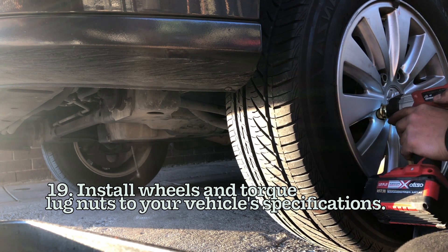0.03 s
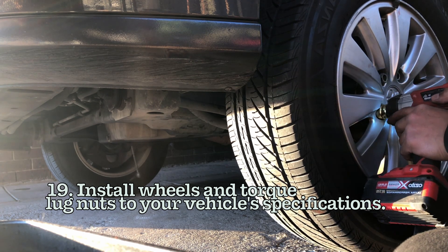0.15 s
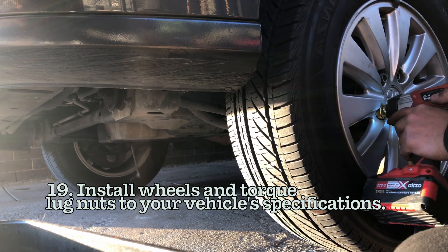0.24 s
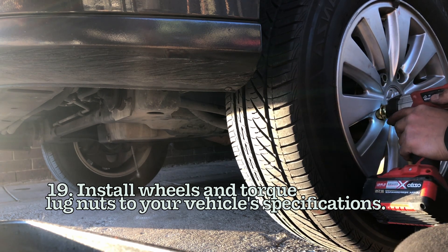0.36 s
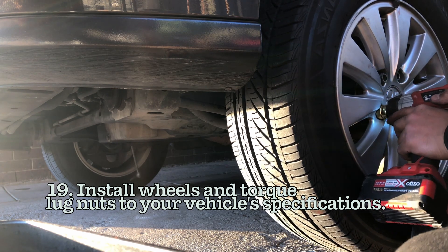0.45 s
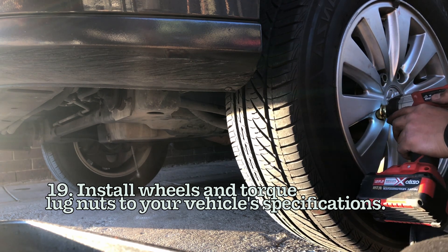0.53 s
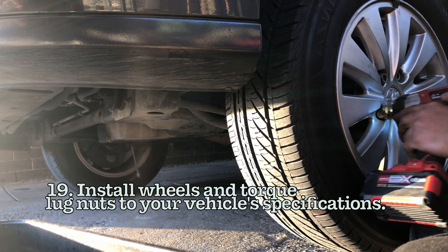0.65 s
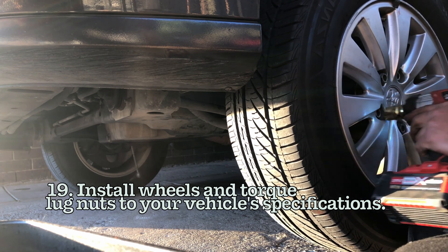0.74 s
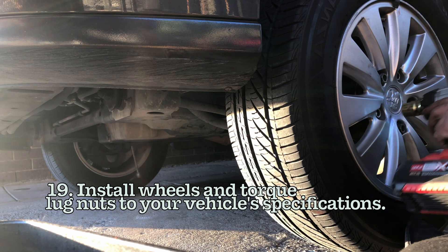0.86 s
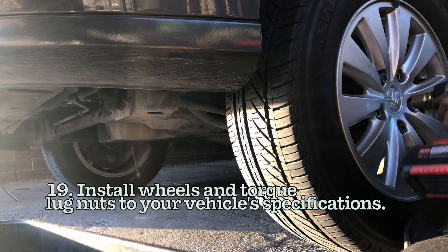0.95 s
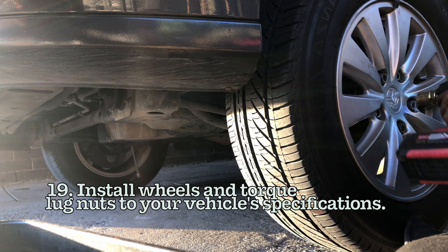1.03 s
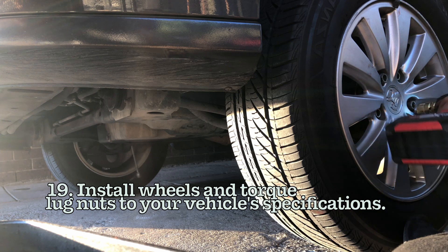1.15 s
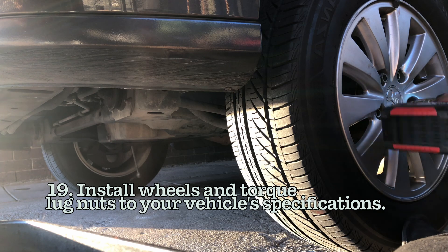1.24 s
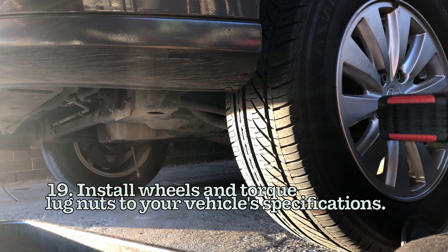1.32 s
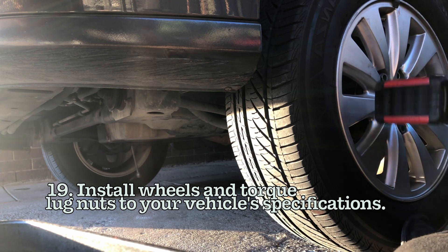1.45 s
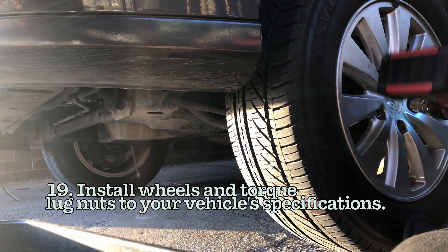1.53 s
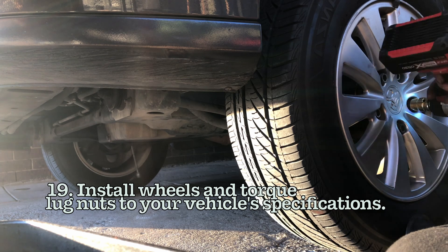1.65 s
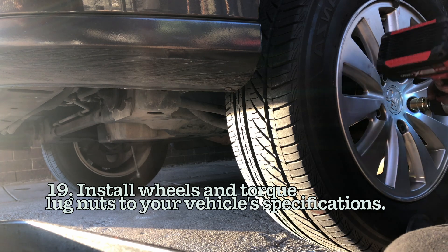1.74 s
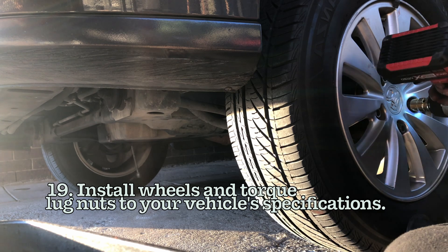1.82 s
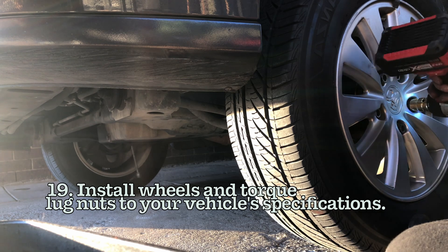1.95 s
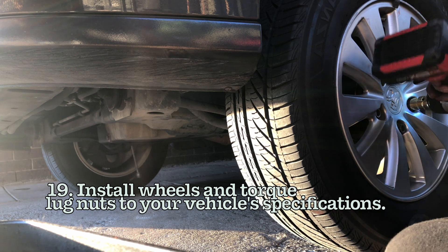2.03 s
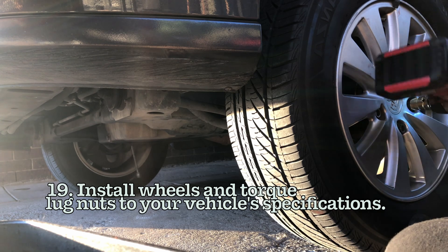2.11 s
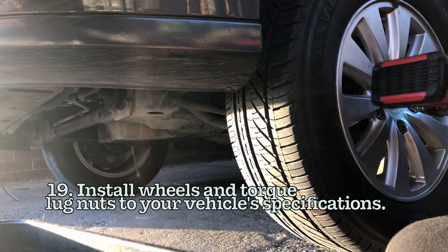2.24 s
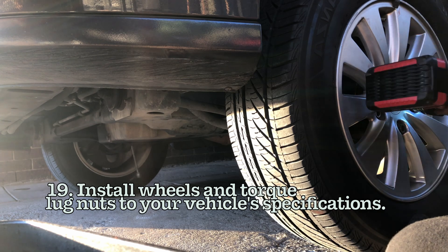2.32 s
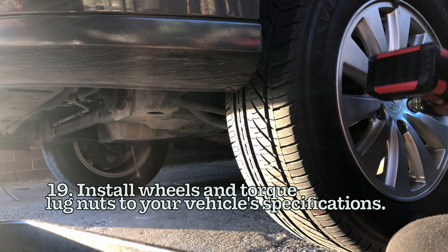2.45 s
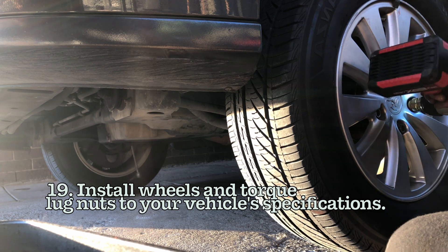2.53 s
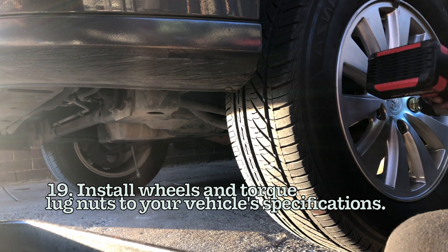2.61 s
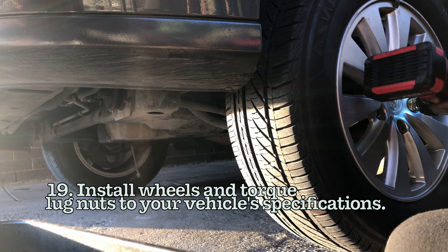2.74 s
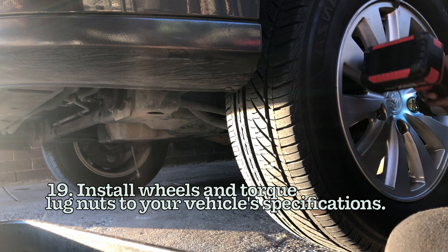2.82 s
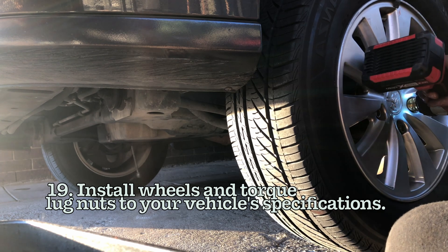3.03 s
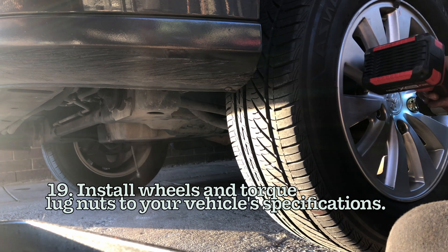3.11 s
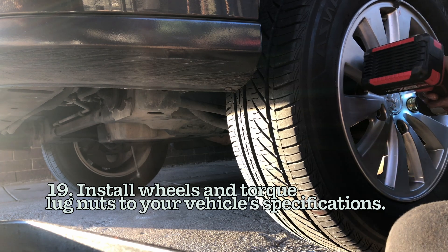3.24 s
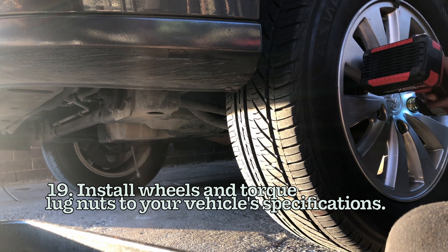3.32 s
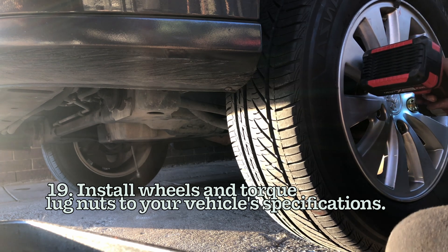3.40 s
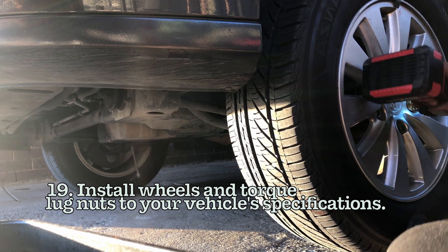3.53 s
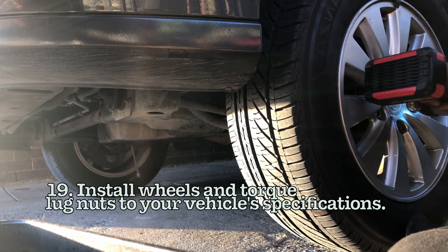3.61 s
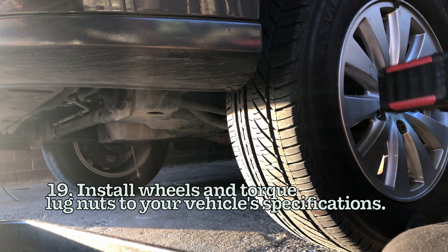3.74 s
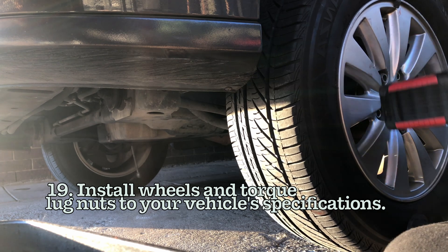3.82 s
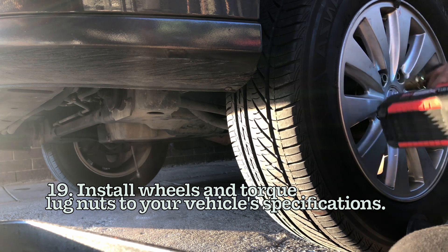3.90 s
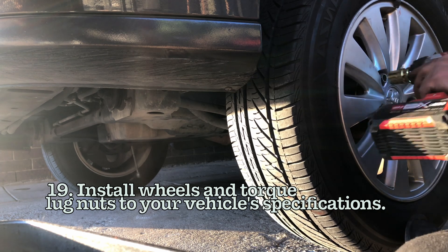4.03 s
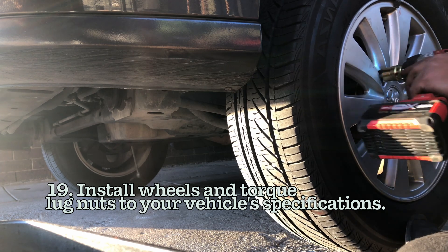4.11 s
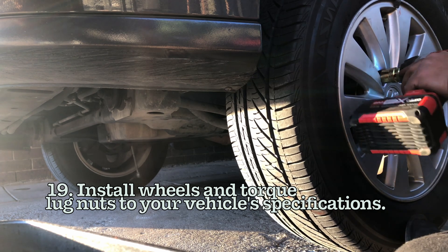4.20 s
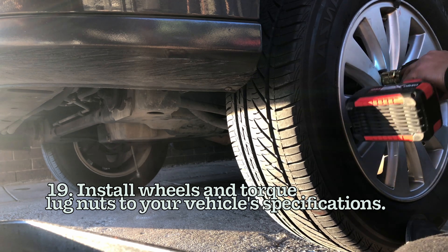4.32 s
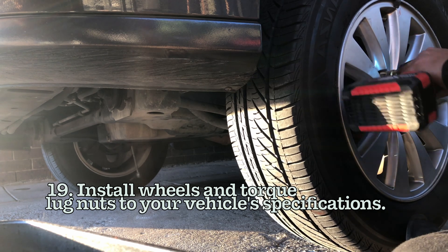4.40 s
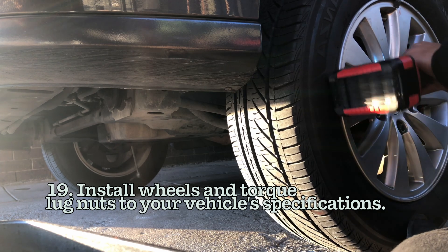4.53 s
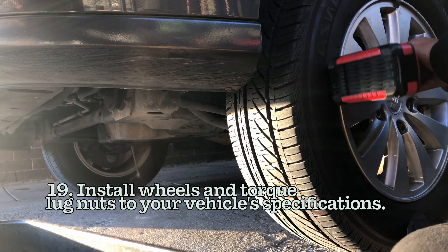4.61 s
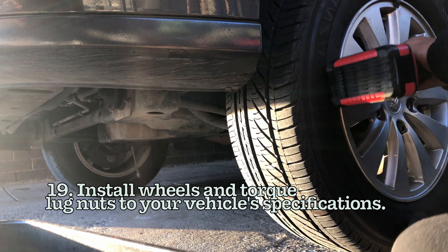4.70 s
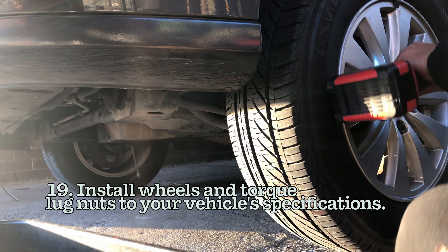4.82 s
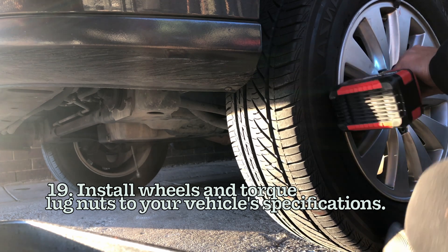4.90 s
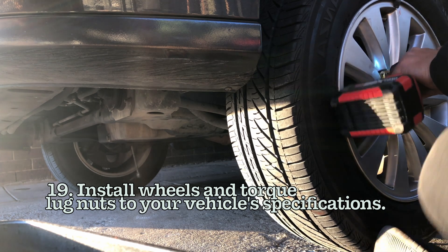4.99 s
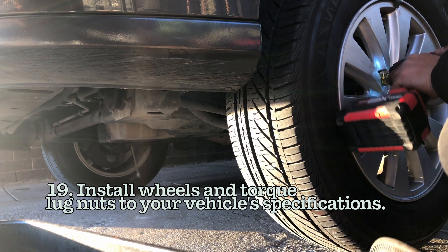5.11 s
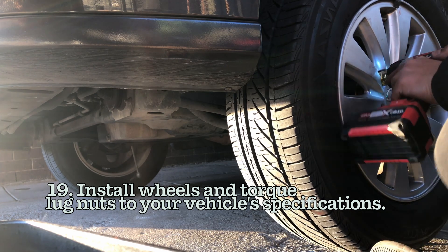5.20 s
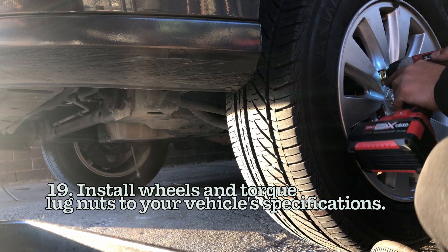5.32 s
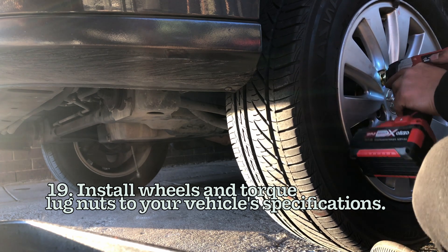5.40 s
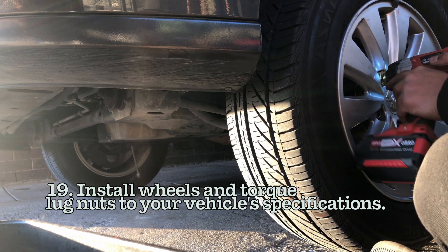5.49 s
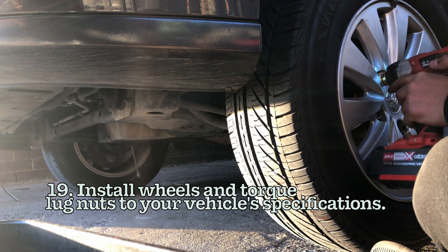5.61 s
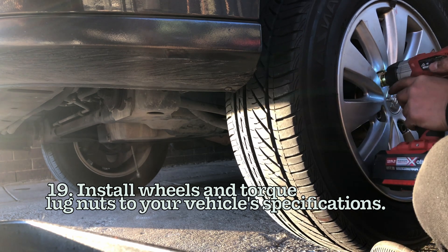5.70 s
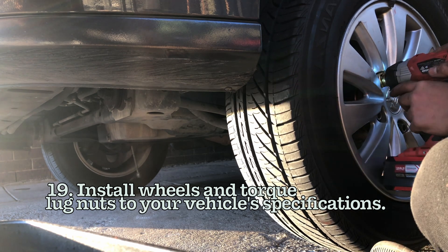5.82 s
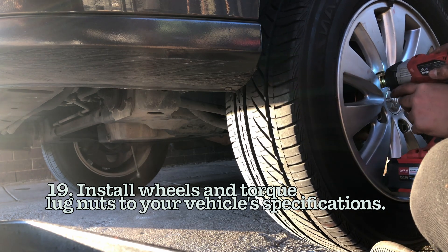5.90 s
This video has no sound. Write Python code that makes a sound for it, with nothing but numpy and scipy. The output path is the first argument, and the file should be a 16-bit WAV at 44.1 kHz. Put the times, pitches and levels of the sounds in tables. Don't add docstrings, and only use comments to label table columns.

```python
import sys
import numpy as np
from scipy import signal
from scipy.fft import rfft, irfft, next_fast_len
from scipy.io import wavfile
from scipy.ndimage import uniform_filter1d

SR = 44100
rng = np.random.default_rng(int(sys.argv[2]) if len(sys.argv) > 2 else 0)


def boost_factor(decibels):
    exponent = np.asarray(decibels, float) / 20
    return 10 ** exponent


def transcribe(signal):
    frames = np.atleast_2d(signal).T
    limited = np.clip(frames, -1, 1)
    pcm = np.round(limited * 32767).astype(np.int16)
    wavfile.write(sys.argv[1], SR, pcm)


N = 262395
T = np.arange(N) / SR

# first_blow_s, last_blow_number, rate_hz, lag_s (lost while gathering speed), gather_blows
BURSTS = [
    (0.0829, 28, 59.2, .0112, 2.5),
    (2.7956, 42, 59.35, .005, 9),
    (5.2968, 39, 60.6, .0075, 13),
]
# time_s, level_db
BUSY = [(0, 9.5), (.66, 1), (.85, -20.5), (1.3, -8), (1.7, -8), (2.15, -2.5), (2.45, 0.5), (2.8, 11.5),
        (3.58, -12), (3.85, -25), (4.15, -13), (4.4, -4), (4.6, -6.5), (4.95, 0), (5.3, -1)]


def evened(x):
    return x / np.sqrt(np.mean(x ** 2) + 1e-20)


def read(points, hz):
    f, value = np.transpose(points)
    return np.interp(np.log(hz + 1), np.log(f + 1), value)


def coloured(x, spectrum):
    size = next_fast_len(len(x) + 512)
    gain = boost_factor(read(spectrum, np.fft.rfftfreq(size, 1 / SR)))
    return irfft(rfft(x, size) * evened(gain), size)[:len(x)]


def add(mix, s, sound):
    part = mix[round(s * SR):][:len(sound)]
    part += sound[:len(part)]


def wander(n, size):
    once = uniform_filter1d(rng.standard_normal(n), size)
    return evened(uniform_filter1d(once, size))


def ring(hz, t60, t):
    return boost_factor(-60 * t / t60) * np.sin(2 * np.pi * hz * t)


def beat(burst):
    start, last, rate, lag, gather = burst
    count = np.arange(last + 1)
    return start + count / rate + lag * (1 - np.exp(-count / gather))


def hammer():
    # time_s, peak_db
    stumbles = [(0.5817, -9), (3.523, -10.5), (4.876, -1), (4.9152, -4), (4.9508, -11), (4.9623, 1.5),
                (4.9804, -5), (5.028, -1.5), (5.0416, -8.5), (5.063, -12), (5.0729, 0.5), (5.098, 3.5),
                (5.117, 0), (5.137, -5.5), (5.1577, 0.5), (5.185, -4.5), (5.2034, -11)]
    settled_db = [-14.5, -15.5, -12]
    loose_db = [3.5, 2, 0]
    seating_blows = 8
    s, peak_db = np.transpose(stumbles)
    out = blows(s, peak_db - 8.0, 2) + thud(s)
    for nut, burst in enumerate(BURSTS):
        at = beat(burst)
        chance = rng.standard_normal((len(at), 2)) * [.0003, 1.2]
        loose = np.exp(-np.arange(len(at)) / seating_blows)
        strength_db = settled_db[nut] + loose_db[nut] * loose + chance[:, 1]
        strength_db[0] += 1
        out += blows(at + chance[:, 0], strength_db, nut) + thud(at)
    return out


def blows(seconds, strength_db, nut):
    # freq_hz, density_db_per_hz
    steel = [
        [(380, -33), (650, -3.5), (1030, -11.5), (1210, -8), (1750, -3.5), (2110, -8.5), (2380, 0.5),
         (3620, -4), (4260, -0.5), (14800, -0.5), (15800, -3.5), (16500, -58.5)],
        [(380, -27), (650, -6), (1350, -12.5), (1870, -7), (2770, -9), (3250, -4), (3770, -10), (4750, -6),
         (11100, -5), (14400, -1), (15600, -2), (16500, -43)],
        [(380, -35.5), (650, -9), (1070, -8.5), (1390, -14), (2380, -3.5), (3480, -7), (4320, -3.5), (5510, -7),
         (7730, -4.5), (15000, -2.5), (15800, -4), (16500, -41.5)],
    ]
    # freq_hz, t60_s, first_nut_db, second_nut_db, third_nut_db
    wheel = [(226.3, 2, -54, -59, -58.5), (368.6, 0.9, -54, -45, -53), (298.2, 0.91, -49.5, -43.5, -51.5),
             (355.7, 0.12, -41, -40.5, -36), (534, 0.37, -37.5, -33.5, -35), (1850, 0.025, -14.5, -19, -17),
             (2300, .014, -13.5, -18.5, -19), (2480, 0.019, -18, -15.5, -10.5),
             (2620, 0.012, -23.5, -25, -12), (2750, 1.0, -52, -63, -76.5)]
    train, lead = np.zeros(N + 400), 300
    train[np.round(seconds * SR).astype(int)] = boost_factor(strength_db)
    t = (np.arange(900) - lead) / SR
    rush = boost_factor(-10.0) * np.exp(-((t + 0.0027) / 0.0026) ** 2)
    after = np.maximum(t + 0.00096, 0)
    crack = 1 - np.exp(-(after / 0.00059) ** 2)
    crack *= np.exp(-after / 0.0013) + boost_factor(-11) * np.exp(-after / 0.0035)
    level = signal.oaconvolve(train, rush + crack)[lead:][:N]
    contact = boost_factor(15.5) * np.roll(train * rng.uniform(-0.87, 1, N + 400), -18)[:N]
    bite = signal.lfilter(*signal.butter(2, 2500, "high", fs=SR), contact)
    out = coloured(level * rng.standard_normal(N) + bite, steel[nut])
    for hz, t60, *db in wheel:
        seated = train[:N] * rng.uniform(-.4, 1.6, N)
        mode = ring(hz, t60, T[:round(t60 * SR)])
        out += boost_factor(db[nut]) * signal.oaconvolve(seated, mode)[:N]
    return out


def thud(seconds):
    train, lead = np.zeros(N), 400
    train[np.round(seconds * SR).astype(int)] = boost_factor(lean_db(seconds) - 14.0)
    t = (np.arange(700) - lead) / SR
    push = np.exp(-((t + .0035) / .0025) ** 2) * np.sin(2 * np.pi * 330 * t)
    push += boost_factor(-4.5) * np.exp(-((t - .0006) / 0.0028) ** 2) * np.sin(2 * np.pi * 1060 * t)
    return signal.oaconvolve(train, push)[lead:][:N]


def lean_db(seconds):
    # start_s, end_s, first_push_db, last_push_db
    leans = [
        (0.083, .59, -26, -20.5),
        (2.79, 3.53, -28, -31),
        (4.877, 5.21, -31.5, -41),
        (5.34, 5.76, -16.5, -18.5),
    ]
    out = np.full(len(seconds), -49.0)
    for start, end, first_db, last_db in leans:
        leaning = (seconds >= start) & (seconds <= end)
        out = np.where(leaning, np.interp(seconds, [start, end], [first_db, last_db]), out)
    return out


def motor():
    # time_s, mesh_hz, whir_db
    pulls = [
        [(0, 2528, -21.5), (.05, 2552, -24.5), (.066, 2480, -18.5), (.084, 2300, -22), (.095, 2250, -38)],
        [(2.452, 347.9, -41), (2.53, 819, -27.5), (2.6, 1340, -28), (2.69, 2225, -24), (2.73, 2541, -24.5),
         (2.765, 2634, -25), (2.785, 2486, -18), (2.8, 2300, -33.5)],
        [(4.73, 501.7, -44), (4.868, 2245, -30.5), (4.884, 1681, -22.5), (4.98, 1876, -27.5),
         (5.06, 2189, -25.5), (5.13, 2405, -32), (5.18, 2464, -26), (5.24, 2428, -31.5), (5.295, 2386, -32)],
    ]
    treble_db = [2.5, 4, 2.5]
    whine_db = [-3.5, -1, -3]
    out = np.zeros(N)
    for row in zip(pulls, treble_db, whine_db):
        add(out, *gear_train(*row))
    return out


def gear_train(pull, treble_db, whine_db):
    s, mesh_hz, whir_db = np.transpose(pull)
    t = np.arange(s[0], s[-1], 1 / SR)
    mesh = np.interp(t, s, mesh_hz)
    octaves = np.log2(mesh / 2550)
    noise = housing_rattle(len(t), octaves, treble_db)
    whine = mesh_whine(mesh)
    shaft = shaft_kicks(mesh)
    sound = boost_factor(-5.0) * noise
    sound += boost_factor(whine_db + 6.5 * octaves) * whine
    sound += boost_factor(-18.5 - 3.5 * octaves) * shaft
    sound *= boost_factor(np.interp(t, s, whir_db))
    fade_out = np.clip((t[-1] - t) / .006, 0, 1)
    fade_in = np.clip((t - t[0] + 0.00045) / 0.0026, 0, 1)
    return s[0], sound * fade_out * fade_in


def housing_rattle(n, octaves, treble_db):
    # freq_hz, density_db_per_hz
    housing = [(180, -55.5), (300, -20), (386, -14.5), (587, -24.5), (987, -17.5), (2060, -12),
               (2930, -8.5), (3590, -13), (4930, -4), (10900, -5.5), (13300, -10), (15700, -7),
               (16500, -55)]
    grain_db = 2.2 * wander(n, 70) + .8 * wander(n, 400)
    rattle = coloured(evened(boost_factor(grain_db) * rng.standard_normal(n)), housing)
    body = signal.sosfiltfilt(signal.butter(3, 4000, fs=SR, output="sos"), rattle)
    treble = rattle - body
    wall = signal.lfilter(*signal.iirpeak(2900, 7, SR), body)
    body += boost_factor(-4 - 6 * octaves) * wall
    return evened(body) + evened(treble) * boost_factor(treble_db + 5.5 * octaves)


def mesh_whine(mesh):
    # mesh_multiple, level_db, load_change_db, flutter_db
    gears = [(.48, -7, 0, 3), (.762, -5, 6, 3), (1, 1, -5, 1.2), (1.525, -8, 3, 3), (1.681, -14, 5, 3.5),
             (2.282, -3.5, 7, 2.5), (3.08, -10, -8, 3)]
    # freq_hz, gain_db
    case = [(600, -16), (1500, -13), (1850, -7), (2150, -16.5), (2600, 5.5), (3600, -11.5), (4900, 1.5),
            (5400, -4.5), (6000, -9), (8200, 7)]
    n = len(mesh)
    slowing = uniform_filter1d(-np.gradient(mesh) * SR, size=400)
    load = np.clip(slowing / 9000, 0, 1)
    whine = 0
    for multiple, db, load_db, flutter_db in gears:
        hz = multiple * mesh * (1 + 0.0032 * multiple * wander(n, 100))
        level_db = db + load_db * load + read(case, hz) + flutter_db * wander(n, 250)
        whine += boost_factor(level_db) * np.sin(2 * np.pi * np.cumsum(hz) / SR)
    return whine


def shaft_kicks(mesh):
    teeth = 6
    turns = np.cumsum(mesh / teeth * (1 + 0.0028 * wander(len(mesh), 300))) / SR
    kicks = np.diff(np.floor(turns), prepend=0) * rng.uniform(.6, 1, len(mesh))
    return evened(signal.lfilter(*signal.iirpeak(2750, 2.5, SR), kicks))


def jolts():
    # blow_number, level_db, direction
    hard_blows = [
        [(10, -35, 1)],
        [(3, -33, 1), (5, -34.5, -1), (8, -29, -1), (10, -18, 1), (12, -16.5, -1), (13, -20.5, 1),
         (14, -22.5, 1), (16, -16, -1), (17, -16, 1), (18, -23, 1), (19, -19.5, -1), (21, -20.7, 1),
         (22, -19, -1), (25, -17, -1), (26, -17, 1), (28, -21, 1), (29, -20, 1), (31, -20.5, -1), (33, -23, 1),
         (35, -17.5, -1), (36, -19.5, 1), (39, -30, 1), (41, -31, -1)],
        [(23, -26.5, 1), (26, -16.5, -1), (28, -15.5, 1), (30, -14.5, -1), (32, -10.5, 1), (33, -15, -1)],
    ]
    out = np.zeros(N)
    for burst, rows in zip(BURSTS, hard_blows):
        for blow, db, direction in rows:
            add(out, beat(burst)[blow] - .0012, direction * boost_factor(db) * pop())
    return out


def pop():
    t = np.arange(1, 1500) / SR
    sweep = np.cos(2 * np.pi * np.log(t / .00115) / np.log(2.09))
    fade = 0.55 * np.exp(-(t / .026) ** 2) + 0.68 * np.exp(-((t - .0036) / 0.0021) ** 2)
    fade *= 1 - np.exp(-(t / 0.00046) ** 3)
    rebound = 0.77 * np.exp(-((t - .0158) / 0.0015) ** 2)
    return sweep * fade - rebound


def handling():
    # time_s, peak_db, ring_hz, t60_s
    clacks = [(1.2381, -25, 1860, .033), (1.3968, -29, 3500, 0.078), (2.2176, -28.5, 2800, .11),
              (2.2339, -24.5, 1800, 0.089), (2.2524, -15.5, 1830, 0.042), (2.4616, -20, 2900, 0.076),
              (4.2246, -27, 2870, 0.052), (4.7358, -23, 2830, .063)]
    # time_s, peak_db, ring_hz, treble_re_peak_db
    ticks = [(0.9596, -52, 1750, -1.5), (1.322, -58, 2000, -15), (1.4925, -44.5, 2480, -28.5),
             (1.5677, -49.5, 2800, -17), (1.6005, -50.5, 3000, -22), (1.677, -68, 1796, -2.5),
             (1.8015, -43, 2240, -28), (1.83, -52.5, 1750, -19.5), (1.9227, -63.5, 1850, 6.5),
             (2.0567, -45.5, 2820, -6), (2.134, -44.5, 1850, -30), (2.4154, -38, 2550, -20),
             (4.0927, -60, 2260, -8), (4.3067, -32, 2680, -15), (4.3445, -38, 2450, -20),
             (4.399, -43, 2330, -13), (4.4357, -56, 3180, -2), (4.4556, -37.5, 2570, -11),
             (4.4808, -34.5, 2420, -17), (4.5121, -42, 2780, -6.5), (4.7244, -28, 2870, -23.5)]
    # time_s, knock_db, click_re_knock_db
    bumps = [(1.79, -47, -26), (1.998, -45.5, -30), (4.1623, -54, -19), (4.211, -46, -37),
             (4.319, -39, -30), (4.37, -39, -30), (4.441, -43.5, -30), (4.5121, -46, -17),
             (4.547, -34, -25), (4.559, -21.5, -13.5), (4.5951, -39, -24), (4.618, -38, -28)]
    # time_s, peak_db, ring_hz, treble_re_peak_db
    pings = [(2.0771, -30, 2900, -28), (2.446, -6, 2600, -44), (3.689, -44, 3000, -8)]
    out = np.zeros(N)
    for s, db, hz, treble_db in ticks:
        add(out, *click(s, db, hz, db + treble_db, db - 22, t60=0.077, tonal=0.27))
    for s, db, hz, t60 in clacks:
        add(out, *click(s, db, hz, db - 4, db - 16.5, t60, tonal=0))
    for s, db, click_db in bumps:
        add(out, *click(s, db + click_db, 1700, db + click_db - 5, db, t60=0.11, tonal=0))
    for s, db, hz, treble_db in pings:
        add(out, *click(s, db, hz, db + treble_db, db - 43, t60=.03, tonal=1.0))
    return out


def click(s, peak_db, hz, treble_db, knock_db, t60, tonal):
    t = np.arange(4000) / SR
    a, b, c, d = rng.standard_normal((4, len(t)))
    fade = 1.475 * boost_factor(-60 * t / max(t60, .005)) + 0.22 * np.exp(-t / 0.0022)
    fade *= 1 - np.exp(-t / 0.00012)
    pitch = tonal * np.sin(2 * np.pi * hz * t) * (1 - np.exp(-(t / .003) ** 2))
    pitch += 0.17 * evened(signal.lfilter(*signal.iirpeak(hz, 3.5, SR), a))
    mid = evened(coloured(b, [(300, -2.0), (700, -7.5), (1800, -0.5), (4500, -3), (7000, -29)]))
    top = evened(coloured(c, [(3000, -30.5), (5500, 2), (12000, -1.0), (17000, -22.0)]))
    tick = boost_factor(peak_db - 5.5) * (pitch + 0.29 * (1 - tonal) * mid)
    sound = (tick + boost_factor(treble_db - 10.5) * top) * fade
    body = evened(coloured(d, [(60, -15), (150, -7.0), (550, -22.5), (1200, -41.5), (3000, -64.5)]))
    body *= boost_factor(-60 * t / 0.086)
    sound += boost_factor(knock_db - 1) * body * (1 - np.exp(-t / 0.0015))
    jolt = signal.lfilter(*signal.butter(2, [70, 900], "band", fs=SR), pop())
    add(sound, 0, boost_factor(knock_db - 9.0) * jolt)
    return s, sound


def walls(x):
    # freq_hz, t60_s
    decay = [(200, 0.077), (1000, 0.46), (4000, .38), (15000, 0.12)]
    hz, _, z = signal.stft(rng.standard_normal(SR), SR, nperseg=256)
    t = np.arange(z.shape[1]) * 128 / SR
    tail = signal.istft(z * boost_factor(-60 * t / read(decay, hz)[:, None]), SR, nperseg=256)[1]
    tail[:200] = 0
    return signal.fftconvolve(x, tail / np.linalg.norm(tail))[:N]


def rustle():
    # freq_hz, density_db_per_hz
    scrape = [(290, -38), (500, 7.5), (1660, -12.5), (2500, -5), (2980, -14.5), (3660, -16.5),
              (13600, -15.5), (16500, -31.5)]
    level_db = -61.5 + 1.1 * np.interp(T, *np.transpose(BUSY))
    grit_db = 5.2 * np.minimum(wander(N, 120), 2.4)
    grit = evened(boost_factor(grit_db) * rng.standard_normal(N))
    return boost_factor(level_db) * coloured(grit, scrape)


def low_rumble():
    # freq_hz, density_db_per_hz
    air = [(18, -47), (30, -16), (64, -2), (93, 2.5), (135, -0.5), (301, -9.5), (376, -9), (585, -16.5),
           (699, -11.5), (953, -18), (1090, -17.5), (1240, -22), (2420, -33), (6000, -36.5), (7800, -60.5),
           (13200, -120)]
    # freq_hz, level_db
    steady_lines = [(122, -63), (226, -74)]
    level_db = -53 + 0.66 * np.interp(T, *np.transpose(BUSY)) + 2.1 * wander(N, 1200)
    out = boost_factor(level_db) * evened(coloured(rng.standard_normal(N), air))
    for hz, db in steady_lines:
        phase = 2 * np.pi * np.cumsum(hz + 0.51 * wander(N, 3000)) / SR
        out += boost_factor(db + 1.6 * wander(N, 4000)) * np.sin(phase)
    return out


def scene():
    tool = hammer() + motor() + handling()
    echo = boost_factor(-11.5) * walls(tool)
    mono = tool + echo + jolts() + rustle() + low_rumble()
    return np.array([mono, mono])


def band_limit(x):
    return signal.sosfilt(signal.butter(12, 16870, fs=SR, output="sos"), x)


def record(dry):
    ceiling = .64
    return band_limit(ceiling * np.tanh(dry / ceiling))


dry = scene()
out = record(dry)
transcribe(out)
```